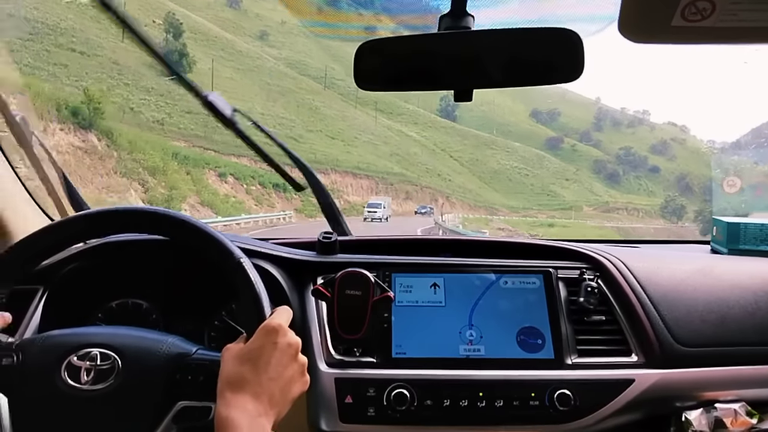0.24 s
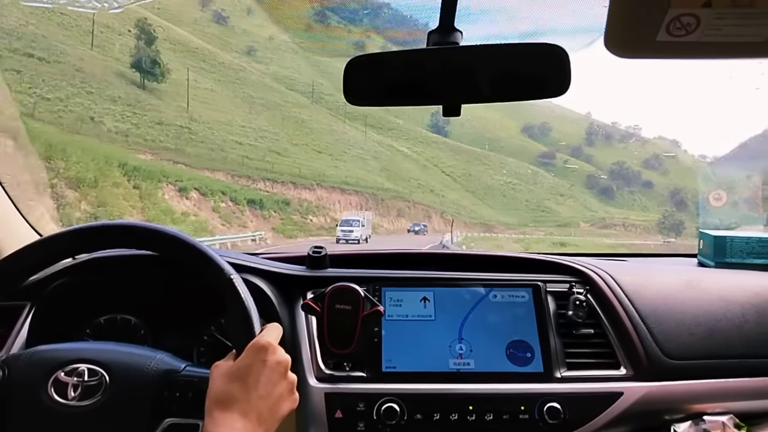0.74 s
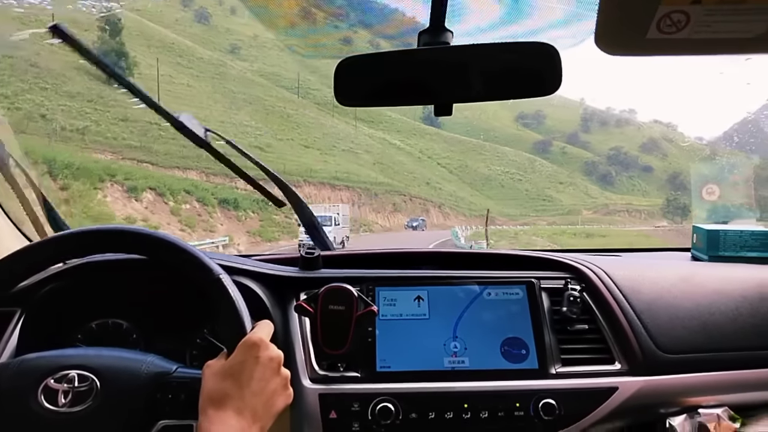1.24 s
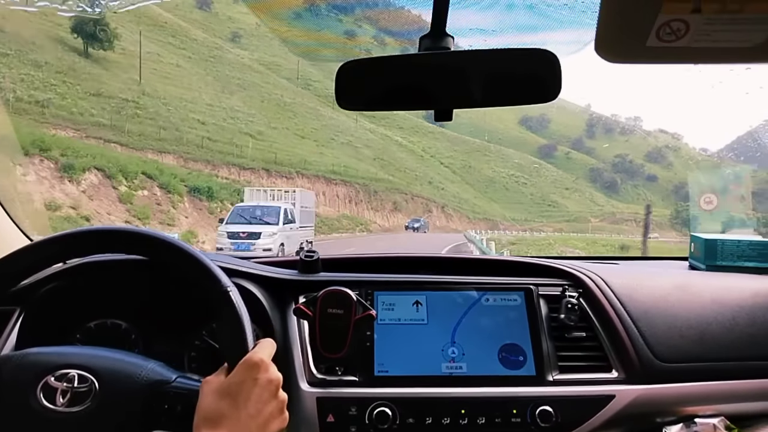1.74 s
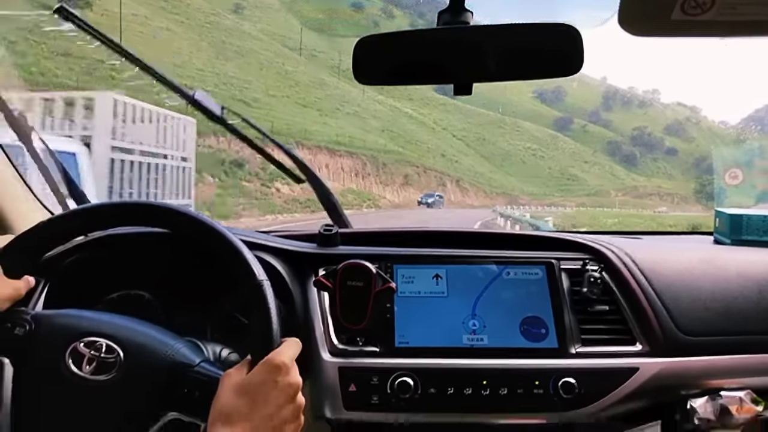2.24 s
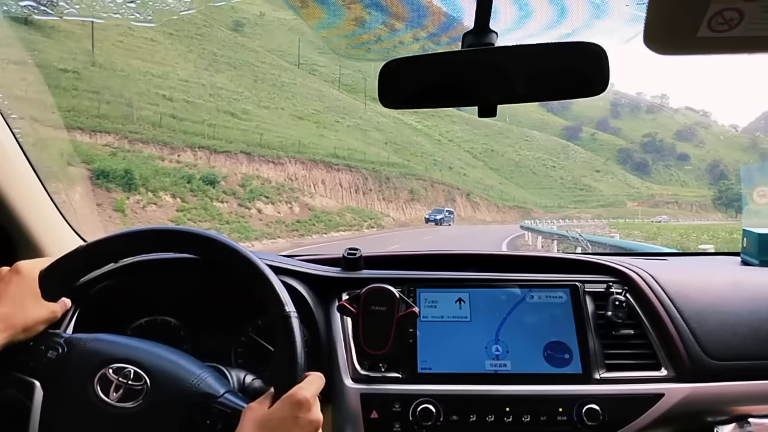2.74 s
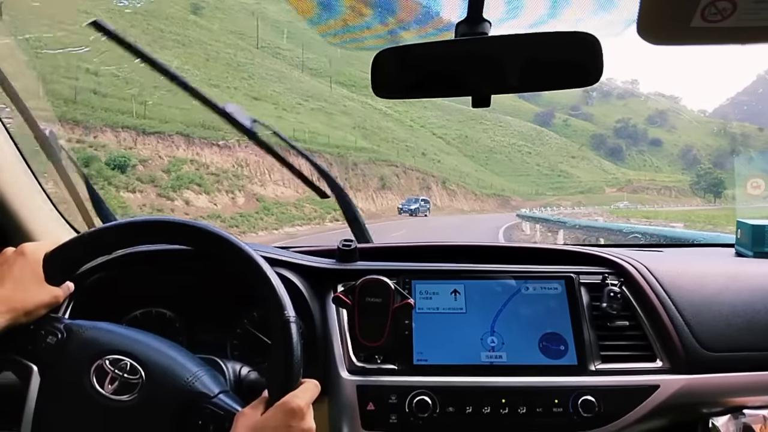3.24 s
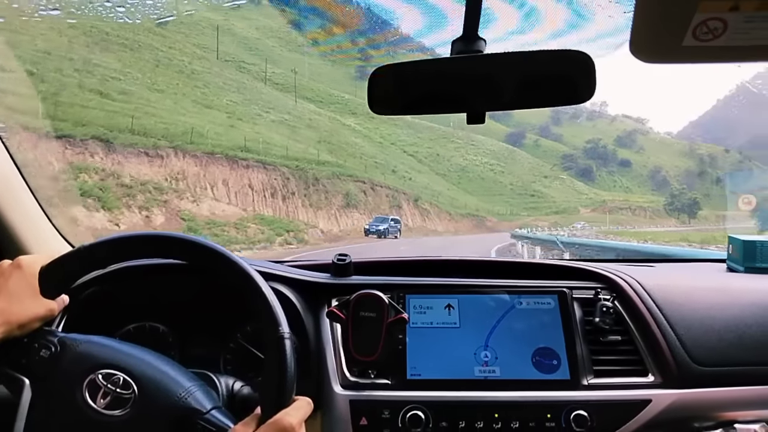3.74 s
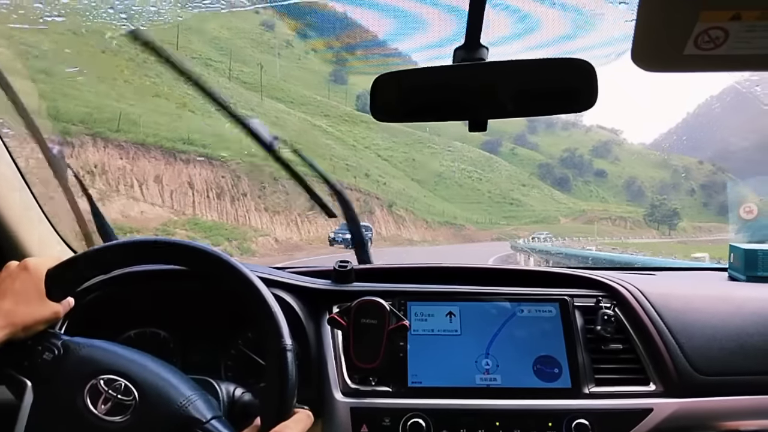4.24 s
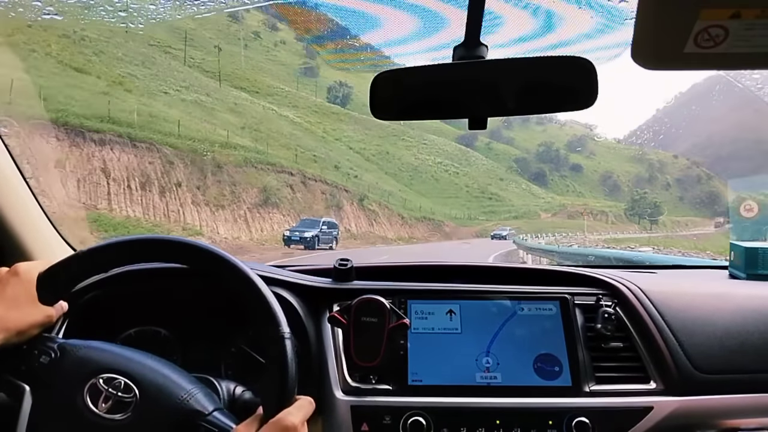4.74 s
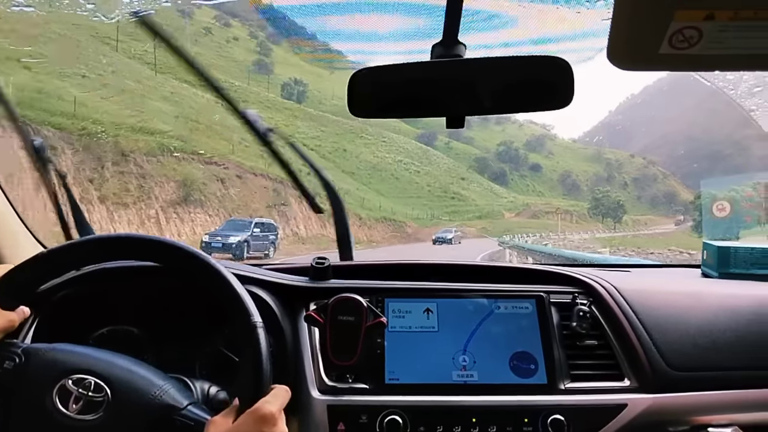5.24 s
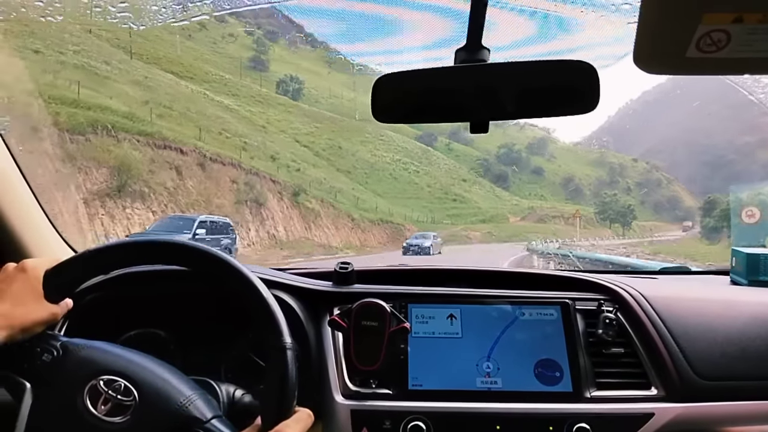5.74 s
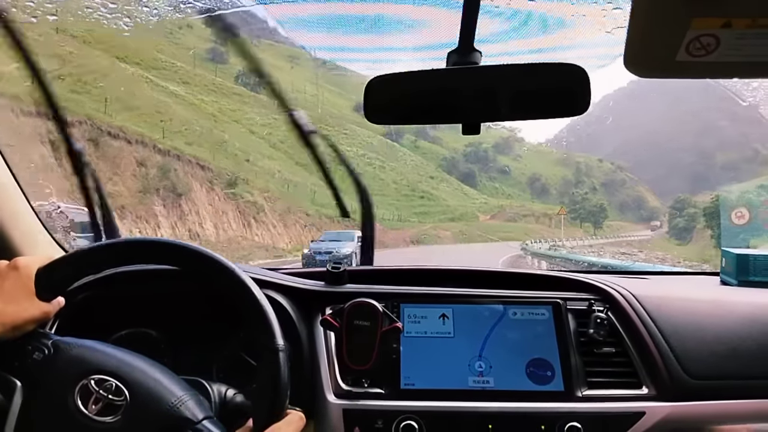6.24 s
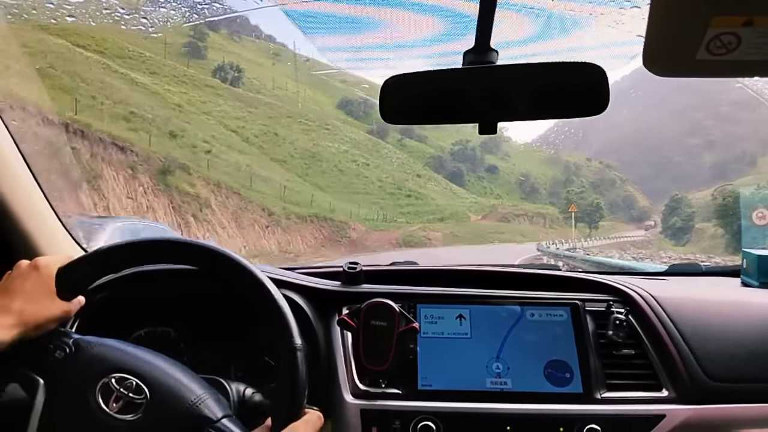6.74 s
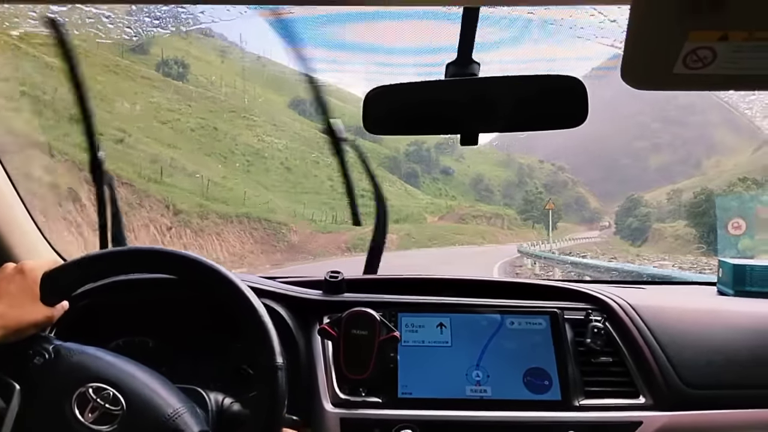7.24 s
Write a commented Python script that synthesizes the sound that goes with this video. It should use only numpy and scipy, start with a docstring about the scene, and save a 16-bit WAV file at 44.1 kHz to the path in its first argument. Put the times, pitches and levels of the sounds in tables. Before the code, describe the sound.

From inside a car on the road, a crisp patter of rain on the windshield swells and eases, dotted with sharper ticks and small wet blips from bigger drops. The wipers keep a steady beat of low thuds, roughly one each second, some stronger than others and a few with a slight rubber judder. Faint tyre rumble runs below, with soft booms from bumps early on and near the end.

```python
"""Rain on the windshield of a moving car, heard from the cabin.
Countless fine drops click on the glass and merge into a gusty patter over a hiss of spray. Large drops
tick, short fuzzy pitched blips come with the louder ones, and the pane rings softly under them.
About once a second the wipers turn round: their arms thud in the cowl and the rubber shudders.
Underneath, the tyres rumble faintly and bumps in the road make the car body boom."""
import sys
import numpy as np
from scipy import signal
from scipy.fft import rfft, irfft, next_fast_len
from scipy.io import wavfile
from scipy.ndimage import uniform_filter1d

SR = 44100
rng = np.random.default_rng(int(sys.argv[2]) if len(sys.argv) > 2 else 0)


def to_wav(sig):
    """Store sig (one row per channel, or 1-D mono) as 16-bit WAV at the path in sys.argv[1].

    Samples outside -1..1 are clipped; the rate is SR.
    """
    pcm = np.clip(np.atleast_2d(sig), -1, 1) * 32767
    pcm = np.round(pcm).astype(np.int16)
    wavfile.write(sys.argv[1], SR, pcm.T)  # frames by channels


N = 329868
TIME = np.arange(N) / SR
USUAL_RAIN_DB = -48

# how hard the rain blows against the glass: time_s, level_db
GUSTS = [(0, -44), (.17, -47), (.26, -50.5), (.35, -46.5), (.58, -46), (.7, -48), (.84, -45), (1.0, -46.5),
         (1.12, -49), (1.38, -47), (1.46, -52), (1.52, -59.5), (1.6, -58), (1.65, -49.5), (1.83, -53),
         (1.94, -51.5), (2.03, -45), (2.11, -41.5), (2.17, -45), (2.29, -46.5), (2.42, -43), (2.48, -47.5),
         (2.53, -55), (2.595, -63), (2.625, -50.5), (2.75, -49.5), (2.87, -55.5), (2.95, -55.5),
         (2.99, -51), (3.05, -44.5), (3.14, -48.5), (3.31, -45), (3.43, -47), (3.5, -51.5), (3.58, -46),
         (3.66, -48), (3.79, -46.5), (3.855, -51.5), (3.9, -47), (4.05, -52.5), (4.19, -50.5), (4.37, -46),
         (4.61, -45), (4.75, -48.5), (4.9, -49.5), (5.08, -47), (5.16, -50), (5.205, -56.5), (5.27, -58.5),
         (5.32, -51), (5.41, -47), (5.54, -44.5), (5.65, -48), (5.9, -46.5), (6.25, -51.5), (6.39, -44.5),
         (6.47, -50), (6.62, -47.5), (6.79, -47), (6.89, -52.5), (7.05, -48), (7.17, -43.5), (7.28, -44.5),
         (7.48, -41)]
# how wet the splatter sounds: time_s, wetness_db
WETNESS_CURVE = [(0, -1.5), (0.85, 1), (1.05, -12.5), (1.95, -15), (2.1, 6.5), (2.47, 8.5), (2.6, -10.5),
                 (2.98, -12), (3.06, 7), (3.45, -4.5), (4.3, -4), (4.45, 2), (5.1, 3), (5.25, -12.5),
                 (5.45, 5.5), (6.0, -1.5), (6.25, -9.5), (6.4, 1.5), (7.05, -5), (7.3, 9.5), (7.48, 9.5)]
# treble ride on the patter and spray: time_s, gain_db
TREBLE_RIDE = [(0, 0.5), (1.15, -0.5), (1.55, -2.5), (1.95, -0.5), (2.58, -2), (2.7, 0.5), (3.3, 3),
               (3.6, -5.5), (3.95, 0), (5.5, -1.5), (7.48, 0)]
# the band that counts as treble: freq_hz, gain_db
TREBLE_BAND = [(4500, -30), (6500, 0)]
# filter that cuts the lows and opens narrow notches when the patter is quiet: freq_hz, gain_db
THINNING_EQ = [(2250, -46), (2430, 3), (2750, 7.5), (2900, -15), (3100, 4), (4680, 1.5), (4890, -9),
               (5100, 1), (7500, 3.5)]
# tone of a click on the glass: freq_hz, level_db
GLASS_SPECTRUM = [(1350, -23.5), (2300, -2), (2660, 5), (3170, 6.5), (5210, 1.5), (7020, -7.5),
                  (8640, -6.5), (15500, -33)]
# narrow dips in the tone of the ticks and hiss: centre_hz, width_hz, gain_db
TONE_NOTCHES = [(1960, 125, -18), (3650, 99, -2), (4900, 460, -1.5)]
# large drops that tick on the glass: start_s, level_db, treble_share_db, spatter_s
LARGE_DROPS = [(0.02, -29.5, -6, 0.0024), (0.0788, -36.5, -10, 0.0068), (0.11, -42, -8, 0.0045),
               (0.18, -40.5, -16, 0.0094), (0.2082, -38.5, -12, 0.0043), (0.3123, -42, -11.0, 0.018),
               (0.3859, -37, -22, 0.0064), (0.666, -41.5, -7.5, 0.0068), (0.7365, -41.0, -14.0, 0.0097),
               (0.778, -40.5, -7.5, 0.012), (0.8034, -41.0, -12, 0.0076), (0.884, -44, -21, 0.005),
               (0.9227, -42, -11.0, 0.0062), (1.1624, -39.0, -8, 0.004), (1.3249, -34.5, -11, 0.0031),
               (1.3629, -35.5, -17, 0.0038), (1.4685, -43.5, -9, 0.007), (1.4894, -41.5, -7, 0.0028),
               (1.652, -45.0, -16, 0.016), (1.769, -42, -9.5, 0.011), (1.961, -42.0, -1, 0.0085),
               (1.982, -40.5, -15.0, 0.0064), (2.0388, -41, -21, 0.005), (2.0858, -38.5, -10, 0.0035),
               (2.097, -35.5, -26, 0.005), (2.1287, -36.5, -15, 0.0035), (2.1584, -39.0, -15, 0.0048),
               (2.208, -37.5, -29, 0.0036), (2.2386, -35.5, -22, 0.0042), (2.3861, -39, -2, 0.0036),
               (2.4094, -39.5, -5, 0.009), (2.4345, -40, -19, 0.0037), (2.45, -35, -22, 0.003),
               (2.6202, -45.0, -10, 0.0083), (2.6392, -40.0, -3.5, 0.0069), (2.7045, -43, -9, 0.009),
               (3.0176, -38.5, -8.5, 0.013), (3.0431, -38.0, -14, 0.014), (3.0571, -34.5, -10.0, 0.0077),
               (3.1032, -41, -4.5, 0.0089), (3.1854, -40.5, -10.0, 0.0044), (3.243, -42.5, -1.5, 0.014),
               (3.281, -41.5, -16.0, 0.014), (3.3488, -39.5, -9, 0.0064), (3.379, -36.5, -9, 0.002),
               (3.4643, -46, -8, 0.012), (3.5519, -46.5, -4, 0.021), (3.5739, -41.5, -13.0, 0.011),
               (3.6118, -35.5, -10, 0.0038), (3.694, -47.5, -7, 0.018), (3.715, -40.0, -11.0, 0.0041),
               (3.7624, -33.5, -9, 0.0026), (3.7824, -42, -13.0, 0.01), (3.815, -38.5, -11.5, 0.0084),
               (3.8798, -40.5, -3, 0.006), (4.1117, -38.0, -14, 0.0049), (4.1565, -40.0, -22, 0.0084),
               (4.224, -43.5, -12, 0.021), (4.2567, -41, -15.0, 0.0068), (4.3343, -41, -9, 0.013),
               (4.4893, -48, -13.0, 0.004), (4.5204, -43, -7, 0.017), (4.5831, -39.5, -6, 0.014),
               (4.633, -33, -8.5, 0.003), (4.6715, -36.5, -10, 0.005), (4.7113, -43.0, -9.5, 0.012),
               (4.7507, -40, -11.0, 0.014), (4.7921, -41.5, -7, 0.0078), (4.818, -40, -1, 0.005),
               (4.845, -36.5, -7, 0.0089), (4.939, -42.5, -8, 0.013), (5.035, -42, -8, 0.011),
               (5.072, -39, -10.5, 0.011), (5.1136, -36.5, -10, 0.004), (5.1365, -42, -11.0, 0.0044),
               (5.1834, -41.5, -7.5, 0.0058), (5.2818, -44, -4.5, 0.007), (5.3533, -44.0, -11, 0.008),
               (5.447, -37.5, -14, 0.0075), (5.5156, -40, -5, 0.0078), (5.628, -40, -16, 0.0077),
               (5.6782, -45, -6, 0.014), (5.7385, -44.5, -8, 0.0072), (5.774, -39, -13.0, 0.0041),
               (5.956, -41.5, -7.5, 0.0093), (5.9717, -37.5, -19, 0.0061), (6.0294, -40.5, -15, 0.0047),
               (6.0783, -41.5, -10, 0.011), (6.116, -36.5, -5, 0.003), (6.149, -41, -15, 0.0084),
               (6.2935, -43.0, -13.0, 0.0067), (6.3139, -35.5, -17, 0.0027), (6.3453, -45, -13, 0.026),
               (6.373, -42, -7.0, 0.013), (6.4134, -39, -15, 0.0046), (6.4324, -50, -4, 0.0056),
               (6.5381, -38.0, -16, 0.0054), (6.5688, -43.5, -10, 0.02), (6.6703, -41.5, -9, 0.0067),
               (6.734, -45, -8.0, 0.018), (6.81, -40.5, -18, 0.0091), (6.888, -37.0, -19, 0.0059),
               (6.95, -43.5, -14, 0.0094), (6.9771, -42, -9, 0.0043), (7.041, -46, -9, 0.006),
               (7.1064, -40.5, -9.0, 0.0081), (7.1758, -35, -7.5, 0.0041), (7.2647, -38.5, -7, 0.0081),
               (7.3109, -32.5, -7, 0.0043), (7.332, -43, -3, 0.0095), (7.3818, -38.5, -12, 0.0024),
               (7.3958, -42, -5.5, 0.015), (7.4342, -41, -14.5, 0.007), (7.448, -35.5, -12, 0.0062)]
# short, fuzzy pitched blips that come with the louder drops: start_s, pitch_hz, level_db, rain_swell_db
LOUD_BLIPS = [(.072, 2264, -39.5, 4), (.19, 1430, -45, 3.5), (.32, 1627, -45, 2), (.385, 1625, -42.5, 3.5),
              (.493, 1723, -46, 1.5), (.575, 2285, -43.5, 1), (.727, 1570, -46, 1.5),
              (.793, 1810, -44.5, 0), (0.926, 2100, -52, 1), (1.133, 2180, -50, 1),
              (1.365, 1120, -51.5, 0.5), (1.648, 1277, -45.5, 2), (1.995, 2150, -46, 1),
              (2.071, 1260, -43.5, 2.5), (2.115, 2290, -42, 0), (2.205, 1150, -45, 0),
              (2.228, 1367, -40.5, 0), (2.352, 1167, -38, 2), (2.438, 1178, -36.5, 2),
              (2.727, 1134, -44.5, 1.5), (2.778, 1120, -49, 0), (3.052, 1760, -36, 2.5),
              (3.175, 1440, -41, 1.5), (3.235, 1310, -38.5, 1), (3.244, 1975, -41, 0),
              (3.566, 2150, -47, 2), (3.579, 1660, -53, -0.5), (3.782, 1335, -41, 6), (3.903, 2140, -49, 2),
              (4.156, 1340, -48.5, 0), (4.228, 1370, -50, 2), (4.355, 2180, -43.5, 0.5),
              (4.402, 1245, -43, 2), (4.427, 1490, -40.5, 0), (4.49, 1226, -45.5, 1), (4.613, 1290, -41, 2),
              (4.789, 1394, -41.5, 1.5), (4.845, 2000, -47, 0), (4.936, 1680, -42.5, 0),
              (5.034, 1312, -38.5, 5), (5.077, 1150, -42, 0), (5.08, 2240, -44, 0), (5.11, 1227, -44, 3.5),
              (5.433, 1490, -37, 2), (5.517, 1310, -43.5, 6), (5.627, 1378, -40.5, 3.5),
              (5.685, 1400, -41.5, 1), (5.967, 1326, -44, 3.5), (6.025, 1330, -44.5, 0),
              (6.325, 1630, -50, 1.5), (6.385, 1150, -47.5, 6), (6.4, 1760, -41, 1),
              (6.576, 1324, -45.5, 4.5), (6.764, 1222, -41, 3), (6.79, 1350, -42.5, 0),
              (6.815, 2120, -45, 1.5), (6.948, 1730, -52, 2), (7.19, 1980, -43.5, 2.5),
              (7.266, 1280, -38.5, 1), (7.307, 1770, -41.5, 2), (7.406, 1097, -43, 0.5),
              (7.448, 1400, -38, 1), (7.45, 1900, -41, 0)]
# the rough splat under each loud blip: freq_hz, level_db
SPLAT_SPECTRUM = [(900, -50), (1130, -2), (1400, 6), (1850, -9), (2300, 10), (3200, -3), (6000, -26)]
# a few low plops: start_s, pitch_hz, level_db
LOW_PLOPS = [(4.423, 605, -49.5), (4.613, 833, -52), (4.893, 895, -55.5), (5.869, 946, -51.5),
             (6.033, 590, -55), (6.382, 790, -54), (6.623, 835, -53)]
# tiny droplets that snap brightly: start_s, level_db
DROPLET_SNAPS = [(0.021, -32), (1.0812, -35), (2.385, -35), (3.0585, -40), (4.522, -37), (4.7126, -37)]
# tone of a snap: freq_hz, level_db
SNAP_SPECTRUM = [(4000, -23), (9000, 1), (11500, 0), (15500, -9)]
# low resonances of the pane: pitch_hz, width_hz, level_db, drive_db_per_wetness_db
PANE_MODES = [(1325, 95, -61, 0.2), (1400, 460, -76, 0.5), (1150, 74, -68.5, 3), (1700, 830, -76, 0),
              (2270, 410, -66, 3)]
# hiss of spray all over the car: freq_hz, level_db
SPRAY_SPECTRUM = [(700, -5), (1000, -37), (2050, -42), (2300, -46), (2600, 9), (3200, 5), (4400, 0),
                  (6500, -4), (8800, -3), (12000, -13.5), (15700, -20)]
# the wipers turn round: time_s, level_db, hardness_db, second_arm_lag_s, rebound_lag_s, rebound_db
WIPER_TURNS = [(0.389, -35, -24, 0.035, 0.063, 4.5), (1.368, -23.5, -5, 0.012, 0.083, -15.5),
               (2.355, -22.5, -7.5, 0.01986, 0.051, 0.5), (3.331, -28.5, -10, 0.0165, 0.074, -5.5),
               (4.31, -28.5, -13.5, 0.015, 0.055, -6), (5.308, -24.5, -5.5, 0.00824, .055, -4),
               (6.285, -34, -30, 0.016, .06, -8), (7.279, -24, 1, 0.008, 0.055, 0)]
# a rubber blade judders on the glass: time_s, level_db
BLADE_JUDDERS = [(0.691, -53), (1.31, -53), (2.306, -41.5), (2.345, -40), (2.373, -36.5), (3.101, -51),
                 (3.231, -48.5), (3.285, -50.5), (7.271, -44)]
# modes of the cowl, a wiper blade and the car body: pitch_hz, level_db, t60_s
COWL_MODES = [(103.2, -2, 0.19), (131.9, 2, 0.19), (161, 0, 0.077), (205.9, 3.5, 0.24), (226, -3, 0.25),
              (305.4, -13.5, 0.16)]
BLADE_MODES = [(343, 4.5, 0.11), (412.2, 10.5, 0.14), (455, 4, 0.1), (528, -17, 0.044)]
BODY_MODES = [(45.4, -6.5, 0.53), (73.5, -6, 0.69), (88.7, 0.5, 0.45), (103.7, 8, 0.1), (182.5, -12, 0.19),
              (221.6, -8.5, 0.13)]
# rubber dragging as the blades flip over: freq_hz, level_db
SHUDDER_SPECTRUM = [(30, -4), (55, -1), (120, 7), (200, 11.5), (300, -11.5), (450, -28), (700, -32),
                    (1500, -56)]
# bumps in the road: time_s, level_db
ROAD_BUMPS = [(0.001, -25), (0.048, -29.5), (0.389, -33), (0.427, -27.5), (0.585, -40.5), (1.643, -38.5),
              (1.833, -42), (2.113, -34.5), (2.19, -45), (2.356, -26.5), (2.406, -32.5), (6.974, -37),
              (7.19, -42), (7.331, -27)]
# tyre rumble as the road surface changes: time_s, level_db
RUMBLE_RIDE = [(0, -59.5), (1.2, -59), (2.0, -59), (3.0, -59), (4.8, -60), (5.8, -60), (7.48, -56.5)]
# tone of the tyres, a shelf that thins their sub-bass, and the rush of air: freq_hz, level_db
TYRE_SPECTRUM = [(15, -31), (25, -3), (96, 1), (156, -3.5), (210, -3.5), (300, -4), (363, -10.5),
                 (458, -11.5), (647, -18.5), (912, -21.5), (1050, -23.5), (1360, -17), (2310, -95)]
TYRE_SHELF = [(20, -19), (42, -15)]
AIR_SPECTRUM = [(800, -22), (1050, -9), (1300, 0), (1700, -8), (2300, -5), (4000, -14), (15000, -30)]


def patter(rain_db, gain_db=-2.5, fine_follow=0.52, flicker_db=-0.25, spots=24):
    """Countless small drops of uneven size land in clumps all over the glass."""
    hits = impacts(per_s=2600, spread_db=3.2)
    spot = rng.integers(0, spots, N)
    ticks = [unit(tick(treble_db=1.44, scatter_db=4, tail_db=-3, tail_t60=0.011)) for _ in range(spots)]
    bed = sum(signal.oaconvolve(hits * (spot == k), ticks[k])[:N] for k in range(spots))
    running_rms = np.sqrt(uniform_filter1d(bed ** 2, size=1200) + 1e-12)
    bed *= clumps() / running_rms
    # lighter rain has finer drops, which sound brighter
    treble_db = fine_follow * (USUAL_RAIN_DB - rain_db) + flicker_db * drift(per_s=30)
    return amp(rain_db + gain_db) * ride_treble(bed, treble_db)


def tick(treble_db, scatter_db, tail_db, tail_t60, size=2048):
    """One drop on the pane: a click coloured by where it lands, then its splash."""
    hz, t = np.fft.rfftfreq(size, 1 / SR), np.arange(size) / SR
    ripple = np.interp(hz, np.geomspace(1500, 16000, 30), rng.standard_normal(30))
    colour_db = read(GLASS_SPECTRUM, hz) + notches(hz) + scatter_db * ripple
    colour_db += treble_db * np.clip(np.log2((hz + 1) / 3800), -.4, 1.1)
    splash = rng.standard_normal(size) * amp(-60 * t / tail_t60)
    splash *= amp(tail_db) / np.linalg.norm(splash)
    splash[0] = 1  # the impact itself
    return signal.fftconvolve(causal(colour_db), splash)[:size]


def notches(hz):
    """Narrow dips in the tone of the ticks and hiss, in dB."""
    return sum(db * np.exp(-((hz - centre) / width) ** 2) for centre, width, db in TONE_NOTCHES)


def impacts(per_s, spread_db):
    """Random clicks, mostly small and a few large."""
    sizes = amp(spread_db * np.minimum(rng.exponential(1, N), 4))
    return sizes * rng.choice([-1, 1], N) * (rng.random(N) < per_s / SR)


def clumps(per_s=72, decay_s=.006, even_share=0.19):
    """Gain of drops landing in clumps: each clump starts at once and thins out quickly."""
    starts = (rng.random(N) < per_s / SR) * rng.uniform(.3, 1, N)
    power = signal.lfilter([1], [1, -np.exp(-1 / (decay_s * SR))], starts)
    return np.sqrt(even_share + (1 - even_share) * power / power.mean())


def flurries(rise_s=.018, lead_s=.012):
    """The rain's level in dB: slow gusts, plus quick swells of spatter at the loud blips."""
    level_db = curve(GUSTS)
    for start_s, _, _, swell_db in LOUD_BLIPS:
        age = np.maximum(TIME - start_s + lead_s, 0)
        level_db += swell_db * swell(age, rise_s)
    return level_db


def thin_when_quiet(rain, rain_db, midpoint_db=-50, range_db=8):
    """Fades in a filter that cuts the lows and opens narrow notches when the patter is quiet."""
    blend = .5 - .5 * np.tanh((rain_db - midpoint_db) / range_db)
    return (1 - blend) * rain + blend * shaped(rain, lambda hz: read(THINNING_EQ, hz))


def ride_treble(rain, gain_db):
    """Turns the rain's treble up and down."""
    treble = shaped(rain, lambda hz: read(TREBLE_BAND, hz))
    return rain + treble * (amp(gain_db) - 1)


def drops(rain_db, wet_db, medium_db=-45.5, medium_count=100):
    """Large drops stand out as ticks; medium ones fall at random between them, harder in the gusts."""
    out = np.zeros(N)
    usual_share_db = np.median(np.array(LARGE_DROPS)[:, 2])
    for start_s, db, share_db, spatter_s in LARGE_DROPS:
        hit = drop(share_db - usual_share_db, np.interp(start_s, TIME, wet_db), spatter_s)
        add(out, start_s, amp(db) * hit)
    variations = rng.uniform([-4, -3], [2, 4], (medium_count, 2))
    starts = landing_times(rain_db, follow=0.54, count=medium_count)
    for start_s, (size_db, bright_db) in zip(starts, variations):
        gust_db = min(np.interp(start_s, TIME, rain_db) - USUAL_RAIN_DB, 2)
        hit = drop(bright_db, np.interp(start_s, TIME, wet_db), spatter_s=0.006)
        add(out, start_s, amp(medium_db + size_db + gust_db) * hit)
    return out


def drop(bright_db, wet_db, spatter_s, brightest_db=9, fragment_db=-6.5, count=12):
    """A tick that crumbles into fragments, over a blip that is louder the duller and wetter it is."""
    click = tick(0.96 * min(bright_db, brightest_db), scatter_db=1.5, tail_db=-6, tail_t60=0.044)
    blows = np.zeros(SR // 10)
    blows[0] = 1  # the main blow; the fragments land after it, ever more sparsely
    quantiles = (np.arange(count) + rng.random(count)) / (count + 1)
    delays_s = -.5 * spatter_s * np.log(1 - quantiles)
    for delay_s, size in zip(delays_s, rng.standard_normal(count)):
        add(blows, delay_s, np.array([size * amp(fragment_db)]))
    spatter = signal.fftconvolve(click, blows)
    blip_db = -20 - 0.23 * bright_db + wet_db
    out = amp(blip_db) * blip(rng.uniform(1400, 2300), tone_db=-10)
    add(out, 0, spatter * np.sqrt(spatter_s * SR) / np.linalg.norm(spatter))
    return out


def loud_blips(blip_db=2.5, splat_db=-9.5, trail_db=-7.5, scatter_s=0.04, scatter_octaves=0.23):
    """Blips at 1-2.3 kHz come with the louder drops, each with a splat and four softer blips after."""
    out, t = np.zeros(N), np.arange(SR // 8) / SR
    for start_s, hz, db, _ in LOUD_BLIPS:
        add(out, start_s, amp(db + blip_db) * blip(hz))
        splat = swell(t, rise_s=0.003) * noise(SPLAT_SPECTRUM, len(t))
        add(out, start_s, amp(db + splat_db) * splat)
        for late, step in rng.random((4, 2)):
            near_hz = max(hz * 2 ** (scatter_octaves * (3 * step - 1)), 1200)
            add(out, start_s + scatter_s * late, amp(db + trail_db) * blip(near_hz, tone_db=-19))
    return out


def blip(hz, tone_db=-7, tail_db=-6, tail_t60=0.13, width_hz=90, rise_s=.004, ring_cycles=250):
    """A short, fuzzy pitched blip: a dying sine inside a narrow band of noise."""
    t = np.arange(SR // 7) / SR
    ring_t60 = min(ring_cycles / hz, .09)  # the highest tones die sooner
    ring = np.sin(2 * np.pi * hz * t) * amp(tone_db - 60 * t / ring_t60)
    band = shaped(rng.standard_normal(len(t)), lambda f: -10 * np.log10(1 + ((f - hz) / width_hz) ** 6))
    fade = amp(-60 * t / tail_t60)
    fuzz = fade * band
    fuzz *= amp(tail_db) * np.linalg.norm(fade) / np.linalg.norm(fuzz)
    return (ring + fuzz) * (1 - np.exp(-(t / rise_s) ** 2))


def blips(drive_db, level_db, tone_db, low_hz, high_hz, follow, count):
    """Soft blips of random pitch and level that crowd in where the drive is high."""
    out = np.zeros(N)
    pitches = low_hz + (high_hz - low_hz) * rng.beta(1.6, 1.4, count)
    sizes_db = rng.uniform(-4, 3, count)
    for start_s, hz, size_db in zip(landing_times(drive_db, follow, count), pitches, sizes_db):
        add(out, start_s, amp(level_db + size_db) * blip(hz, tone_db))
    return out


def landing_times(drive_db, follow, count):
    """Random times spread over the whole shower, closer together where the drive is high."""
    chance = np.cumsum(amp(follow * drive_db))
    return np.interp((np.arange(count) + rng.random(count)) / count, chance / chance[-1], TIME)


def plops(gain_db=4):
    """A few low, fuzzy plops among the drops."""
    out = np.zeros(N)
    for start_s, hz, db in LOW_PLOPS:
        plop = blip(hz, tone_db=-13, tail_db=-4, tail_t60=0.12, width_hz=64)
        add(out, start_s, amp(db + gain_db) * plop)
    return out


def snaps(gain_db=-3, t60=.02):
    """Tiny droplets give a short bright snap."""
    out, t = np.zeros(N), np.arange(1024) / SR
    for start_s, db in DROPLET_SNAPS:
        burst = rng.standard_normal(len(t)) * amp(-60 * t / t60)
        snap = shaped(burst, lambda hz: read(SNAP_SPECTRUM, hz))
        add(out, start_s, amp(db + gain_db) * snap / abs(snap).max())
    return out


def pane(wet_db, rain_db, lull_db=-52, lull_follow=0.95):
    """Drops keep the glass ringing, less in the lulls; wet flurries fill its resonances with a wash."""
    out, t = np.zeros(N), np.arange(SR // 10) / SR
    hits = impacts(per_s=300, spread_db=3.5)
    hits *= amp(lull_follow * np.minimum(rain_db - lull_db, 0))
    for hz, width_hz, db, wet_follow in PANE_MODES:
        ring = t * np.exp(-np.pi * width_hz * t) * np.sin(2 * np.pi * hz * t)
        out += amp(db) * unit(signal.oaconvolve(hits * amp(wet_follow * wet_db), ring)[:N])
    return out


def spray(rain_db, level_db=-59.5, notch_depth=0.56):
    """Spray all over the car: a smooth hiss that swells with the flurries."""
    hiss = shaped(rng.standard_normal(N), lambda hz: read(SPRAY_SPECTRUM, hz) + notch_depth * notches(hz))
    return amp(level_db + rain_db - USUAL_RAIN_DB) * unit(hiss)


def wipers(thud_db=-3.5, second_arm_db=2.5, shudder_db=-16, judder_db=2, lead_s=0.00697):
    """At each turn the two arms knock in the cowl one after the other, then rebound; blades judder."""
    out = np.zeros(N)
    for time_s, db, hardness_db, second_lag_s, rebound_lag_s, rebound_db in WIPER_TURNS:
        start_s = time_s - lead_s  # early, as the thud takes a moment to swell
        blow = amp(db + thud_db) * knock(COWL_MODES, hardness_db + 5, rise_s=0.0093)
        rebound = amp(db + thud_db + rebound_db) * knock(COWL_MODES, hardness_db + 2, rise_s=0.022)
        add(out, start_s, blow)
        add(out, start_s, amp(db + shudder_db) * shudder())
        add(out, start_s + second_lag_s, amp(second_arm_db) * blow)
        add(out, start_s + rebound_lag_s, rebound)
    for time_s, db in BLADE_JUDDERS:
        add(out, time_s - lead_s / 2, amp(db + judder_db) * knock(BLADE_MODES, 0, rise_s=0.0051))
    return out


def knock(modes, tilt_db, rise_s):
    """A padded blow into a set of modes; a harder one tilts them up by tilt_db per octave."""
    t = np.arange(SR // 3) / SR
    ring, lowest_hz = np.zeros(len(t)), modes[0][0]
    for k, (hz, db, t60) in enumerate(modes):
        fade = amp(db + tilt_db * np.log2(hz / lowest_hz) - 60 * t / t60)
        # neighbouring modes start in opposite directions, so the thud swells for a cycle or two
        ring += (-1) ** k * fade * np.sin(2 * np.pi * hz * t)
    ring *= 1 - np.exp(-(t / rise_s) ** 2)
    return ring / abs(ring).max()


def shudder():
    """The rough rumble of rubber dragging as the blades flip."""
    t = np.arange(SR // 3) / SR
    return noise(SHUDDER_SPECTRUM, len(t)) * swell(t, rise_s=0.034)


def bumps(gain_db=-4, lead_s=0.01024):
    """Uneven road makes the car body boom softly."""
    out = np.zeros(N)
    for time_s, db in ROAD_BUMPS:
        add(out, time_s - lead_s, amp(db + gain_db) * knock(BODY_MODES, 0, rise_s=0.0013))
    return out


def road(lump_db=2, air_db=-76.5):
    """Tyre rumble, lumpy with the road surface, and a faint steady rush of air."""
    rumble = unit(shaped(rng.standard_normal(N), lambda hz: read(TYRE_SPECTRUM, hz) + read(TYRE_SHELF, hz)))
    air = noise(AIR_SPECTRUM, N)
    rumble_db = curve(RUMBLE_RIDE) + lump_db * np.tanh(drift(per_s=6.3))
    return amp(rumble_db) * rumble + amp(air_db) * air


def cabin(x, reverb_db=-14, t60=.35, build_s=.02):
    """The short reverb of the car's inside."""
    t = np.arange(SR // 2) / SR
    tail = rng.standard_normal(len(t)) * amp(-60 * t / t60) * (1 - np.exp(-t / build_s))
    return x + amp(reverb_db) * signal.oaconvolve(x, tail / np.linalg.norm(tail))[:N]


def amp(db):
    """Decibels to gain."""
    return 10 ** (np.asarray(db) / 20)


def unit(x):
    """Scales to rms 1."""
    return x / np.sqrt(np.mean(x ** 2) + 1e-20)


def read(points, hz):
    """A spectrum table's dB at hz, on a log-frequency axis."""
    freqs, db = np.transpose(points)
    return np.interp(np.log(hz + 1), np.log(freqs + 1), db)


def curve(points):
    """An automation table's value at every sample."""
    return np.interp(TIME, *np.transpose(points))


def swell(t, rise_s):
    """An envelope that reaches 1 at rise_s, then dies away."""
    return t / rise_s * np.exp(1 - t / rise_s)


def drift(per_s):
    """Random wander of rms 1."""
    knots = rng.standard_normal(4096)
    return unit(np.interp(TIME * per_s, np.arange(len(knots)), knots))


def add(mix, start_s, sound):
    """Mixes a sound in at start_s."""
    part = mix[max(round(start_s * SR), 0):][:len(sound)]
    part += sound[:len(part)]


def shaped(x, db_of):
    """Filters x by a function from Hz to dB."""
    size = next_fast_len(len(x))
    return irfft(rfft(x, size) * amp(db_of(np.fft.rfftfreq(size, 1 / SR))), size)[:len(x)]


def noise(spectrum, size):
    """Noise of rms 1, coloured by a spectrum table."""
    return unit(shaped(rng.standard_normal(size), lambda hz: read(spectrum, hz)))


def causal(db):
    """The minimum-phase impulse response that has this dB spectrum."""
    log_gain = np.log(amp(np.maximum(db, -90)))
    mirrored = np.concatenate([log_gain, log_gain[-2:0:-1]])
    return np.fft.ifft(np.exp(np.conj(signal.hilbert(mirrored)))).real


def scene():
    """The mono mix: rain up front, wipers and bumps in the cabin's reverb, the road underneath."""
    rain_db, wet_db = flurries(), curve(WETNESS_CURVE)
    bed = thin_when_quiet(patter(rain_db) + spray(rain_db), rain_db)
    rain = ride_treble(bed, curve(TREBLE_RIDE))
    rain += drops(rain_db, wet_db) + snaps() + loud_blips() + plops() + pane(wet_db, rain_db)
    rain += blips(rain_db, level_db=-44.5, tone_db=-11.5, low_hz=2183, high_hz=3510, follow=1.9, count=170)
    rain += blips(wet_db, level_db=-56, tone_db=3, low_hz=1083, high_hz=2435, follow=2.5, count=130)
    return (rain + cabin(wipers() + bumps()) + road())[None]


def record(dry, low_cut_hz=18, high_cut_hz=15650):
    """A gentle low cut and a steep high cut on the whole mix."""
    low_cut = signal.butter(2, low_cut_hz, "highpass", fs=SR, output="sos")
    high_cut = signal.firwin(511, high_cut_hz, window=("kaiser", 9), fs=SR)
    return signal.oaconvolve(signal.sosfilt(low_cut, dry), high_cut[None], "same")


dry = scene()
out = record(dry)
to_wav(out)
```